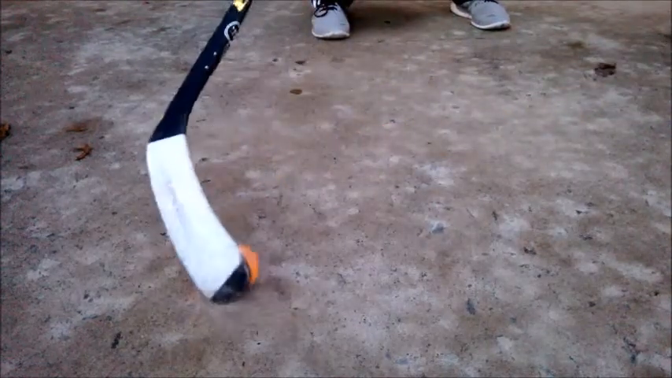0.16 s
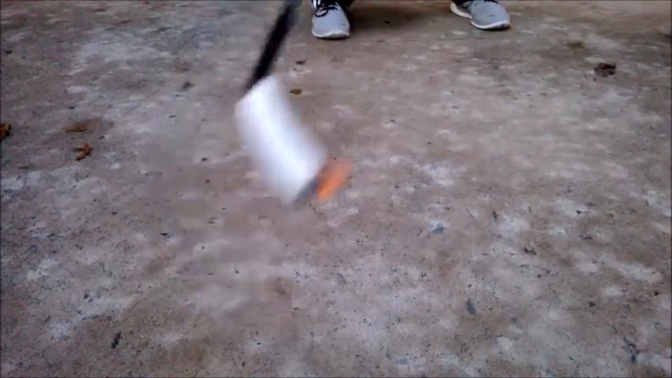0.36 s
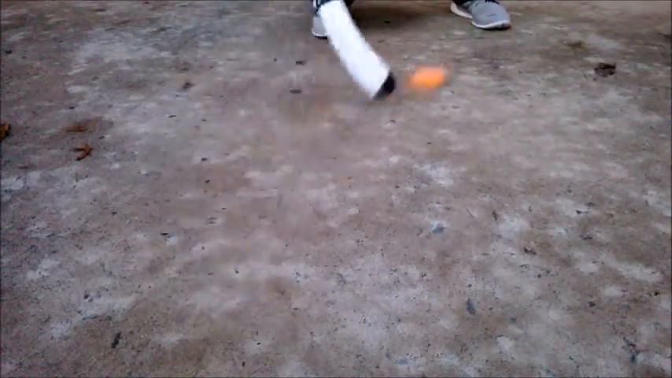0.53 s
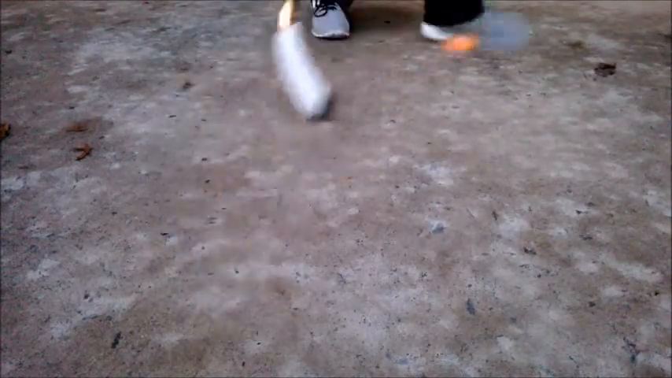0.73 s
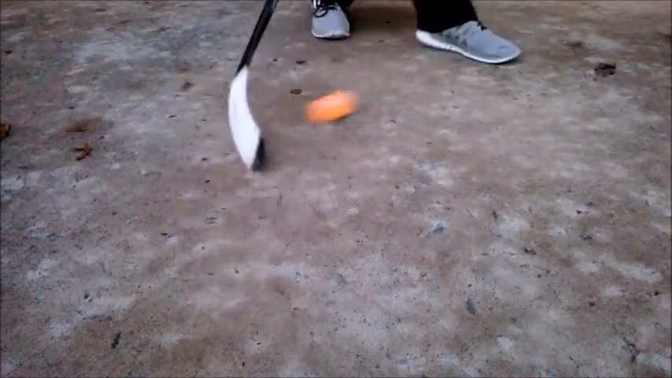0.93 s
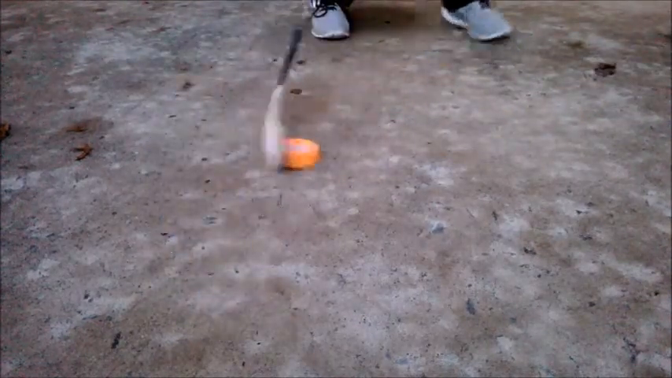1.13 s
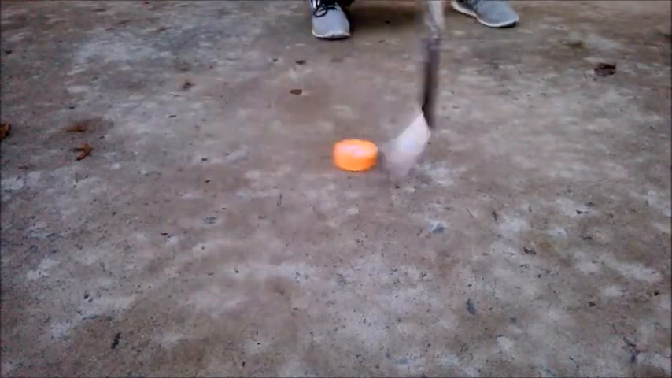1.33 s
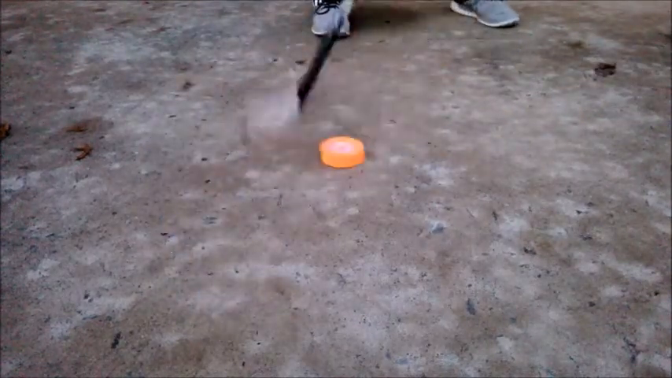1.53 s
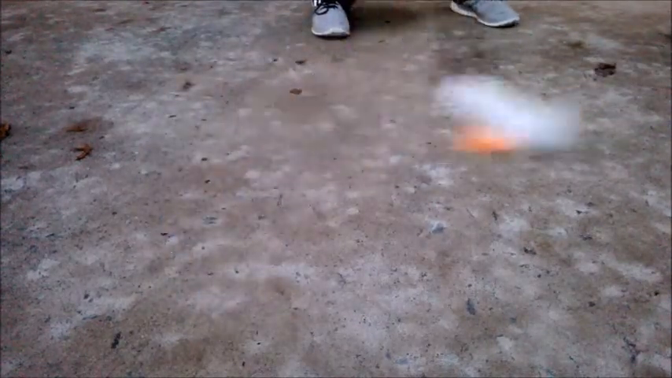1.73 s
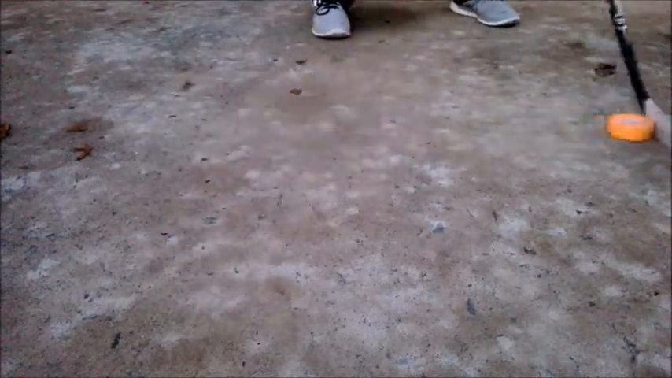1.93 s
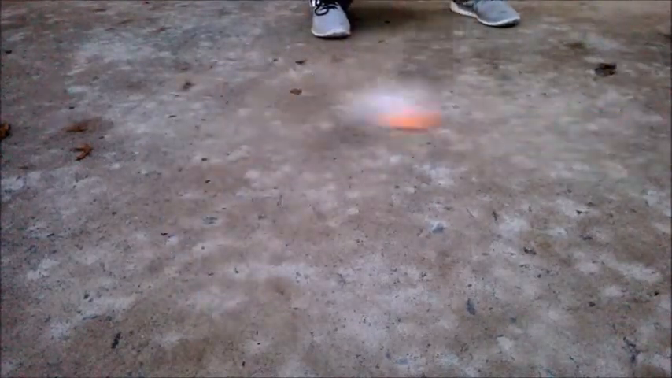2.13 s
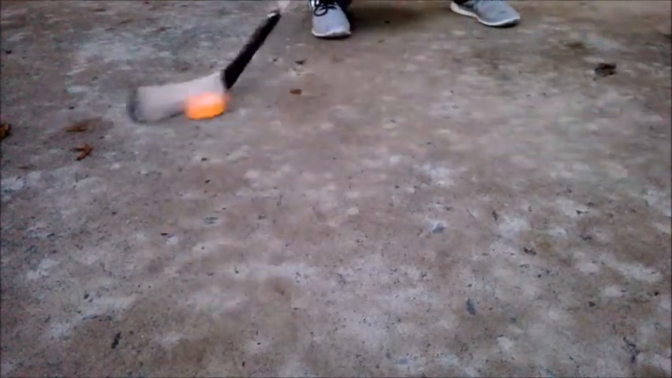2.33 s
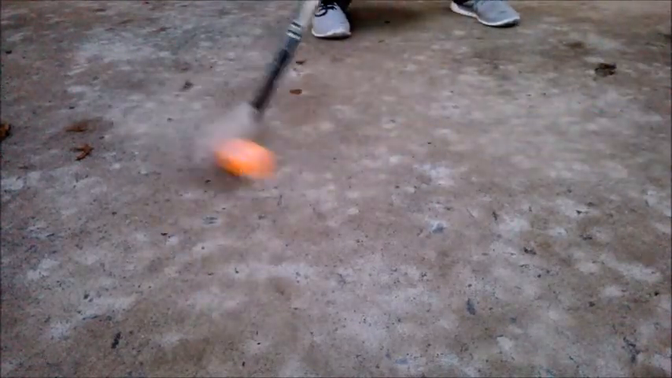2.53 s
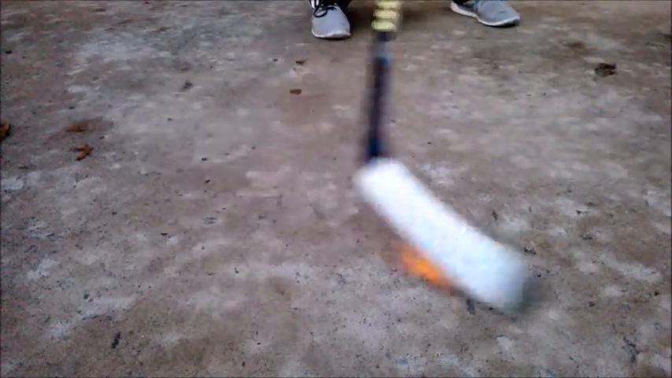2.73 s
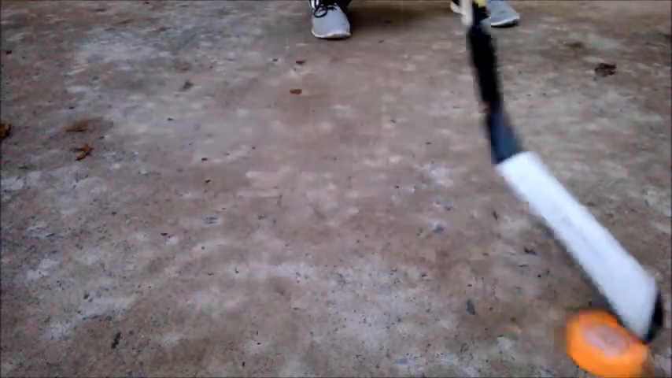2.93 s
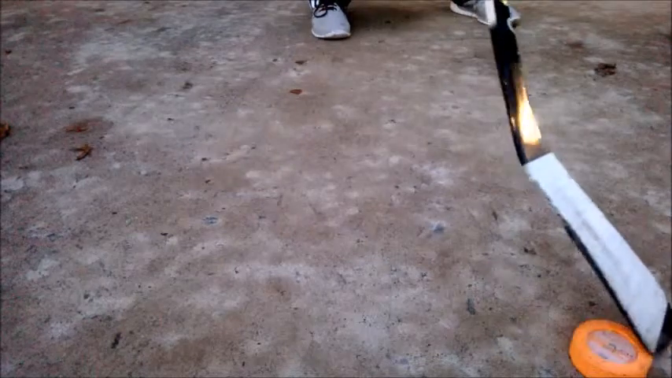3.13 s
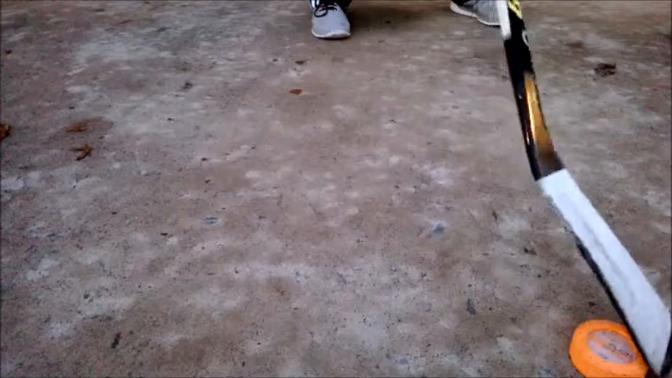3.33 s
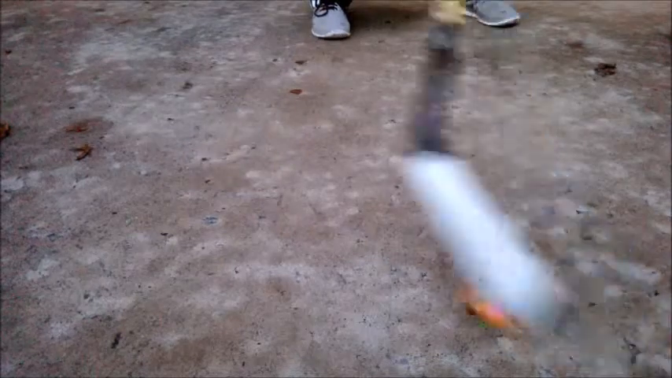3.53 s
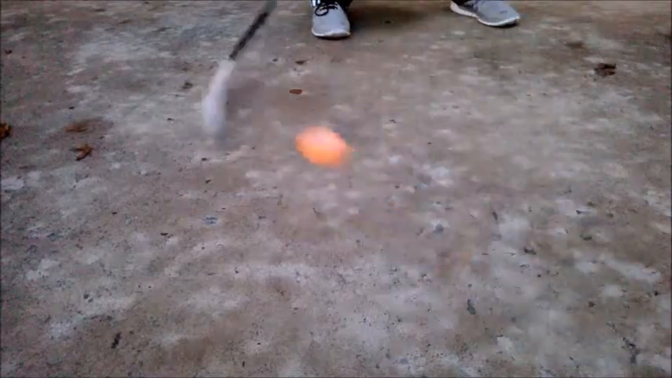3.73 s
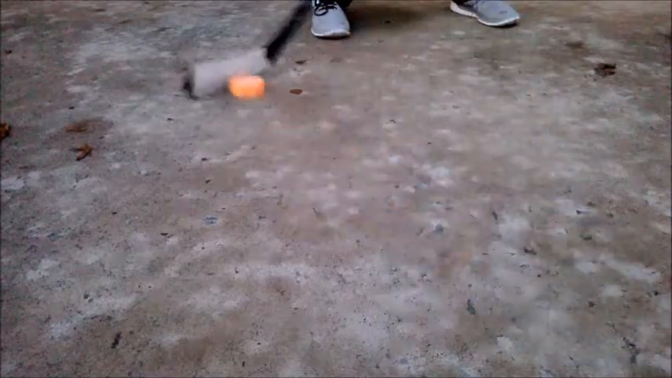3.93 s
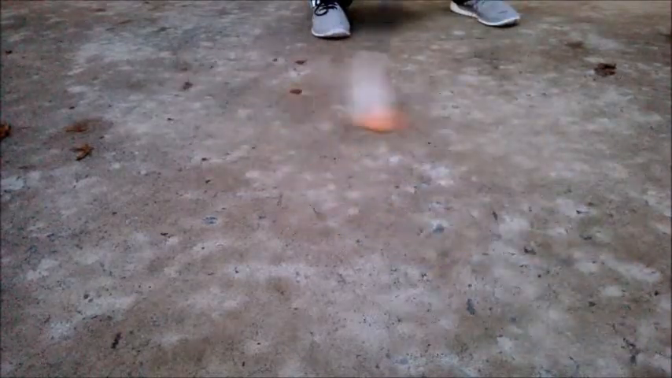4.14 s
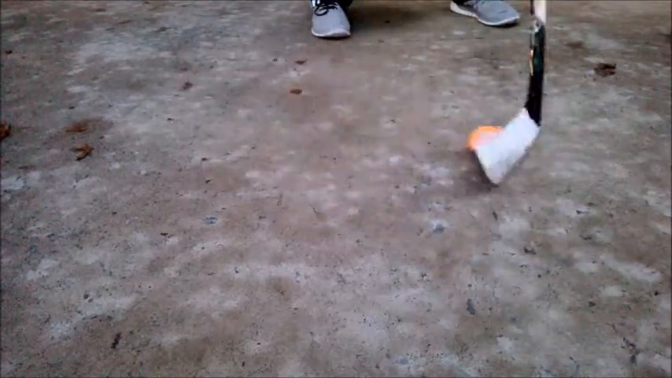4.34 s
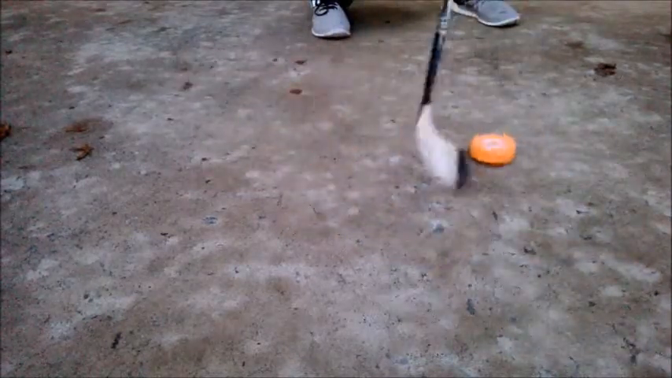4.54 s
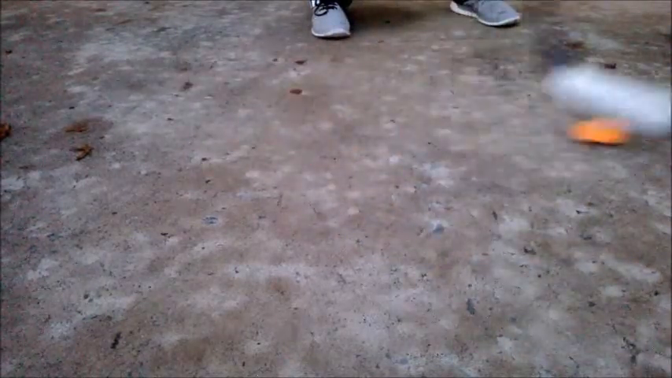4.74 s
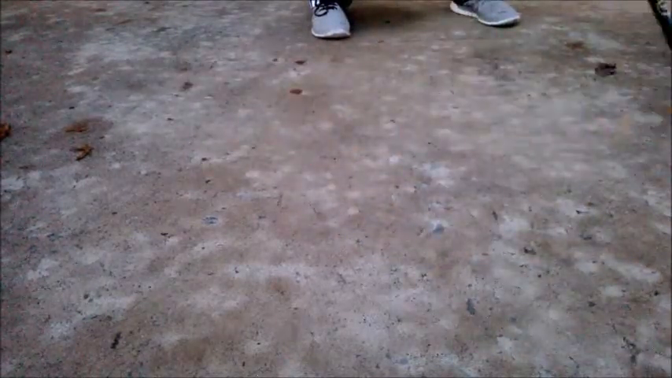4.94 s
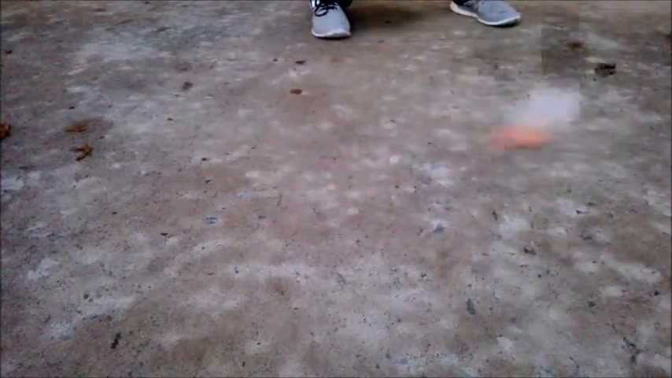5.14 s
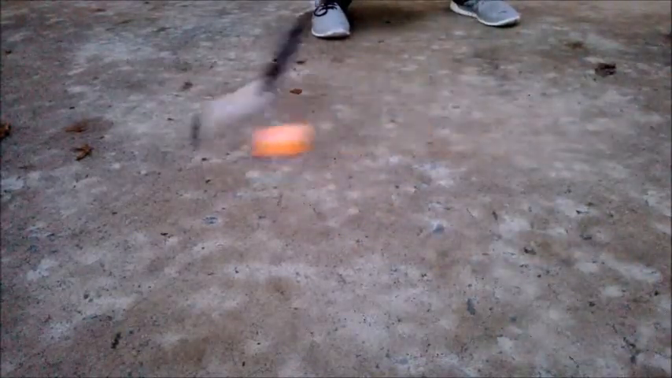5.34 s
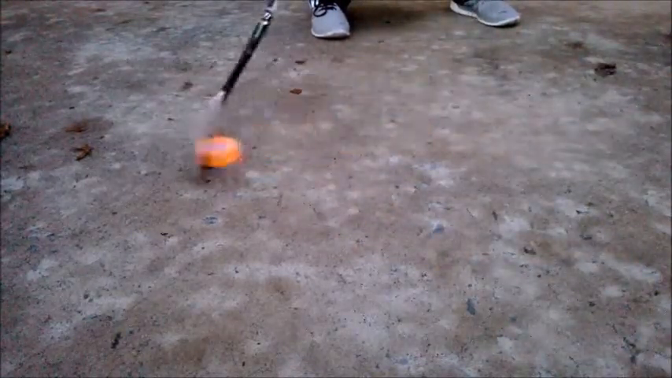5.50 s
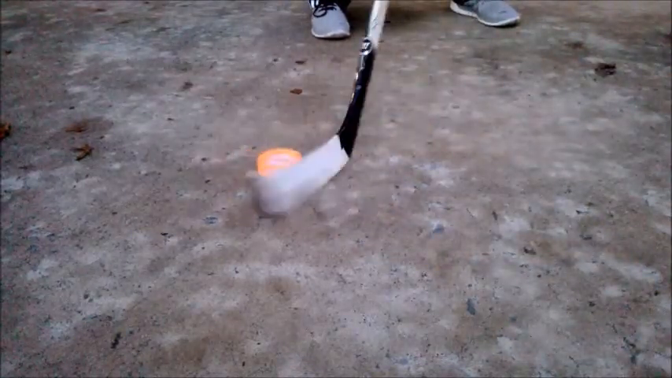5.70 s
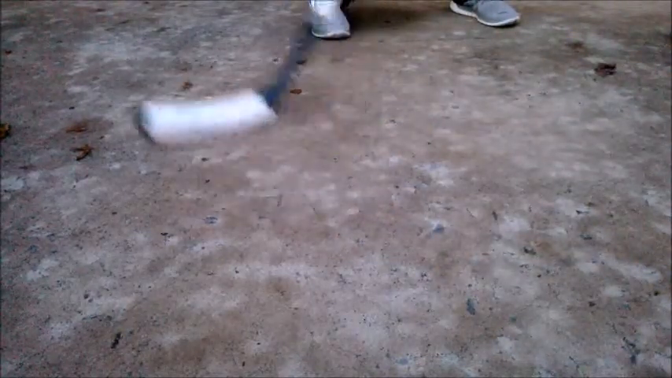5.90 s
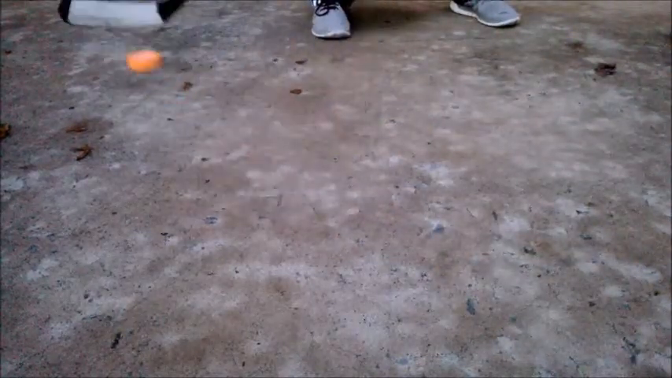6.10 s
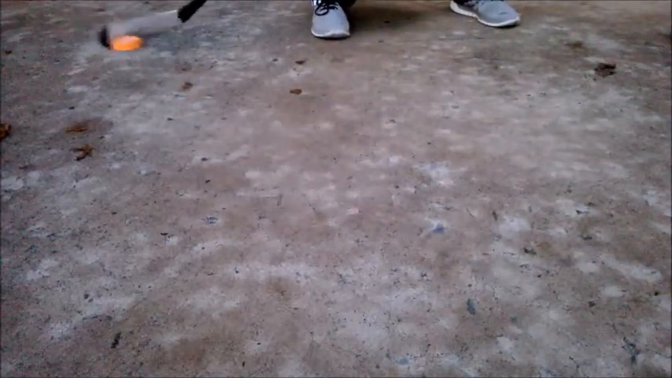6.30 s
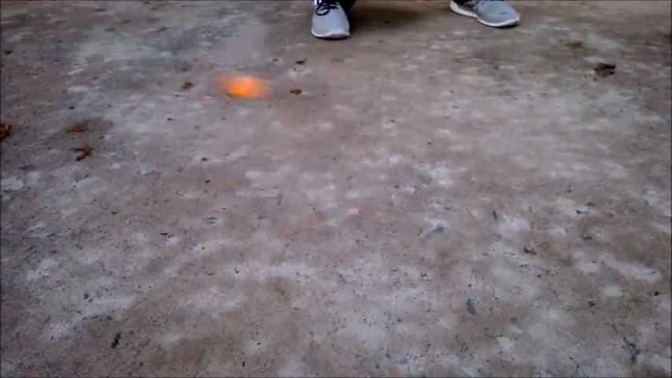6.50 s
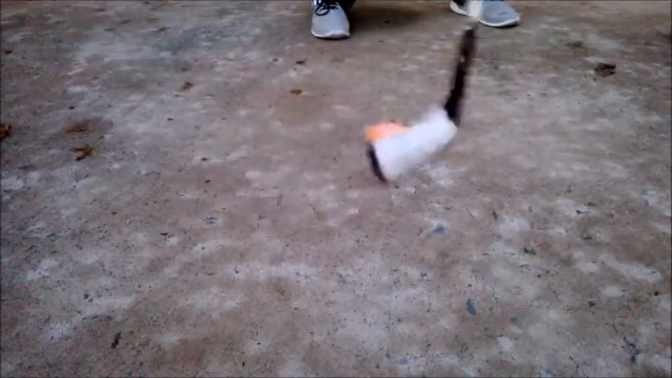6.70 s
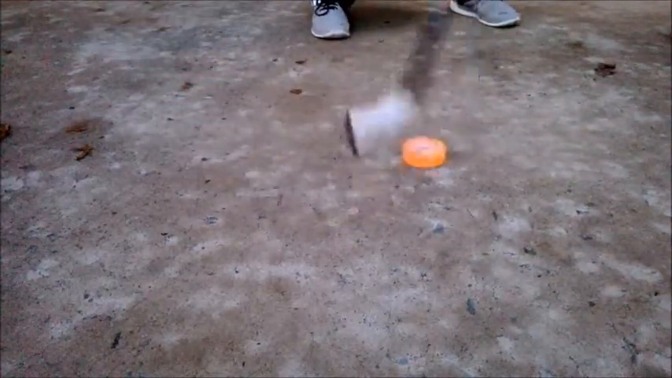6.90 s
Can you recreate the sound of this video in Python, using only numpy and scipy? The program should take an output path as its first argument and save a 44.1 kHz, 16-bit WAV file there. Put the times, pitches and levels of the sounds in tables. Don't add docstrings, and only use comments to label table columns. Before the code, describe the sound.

A taped hockey blade knocks, slaps and scrapes a hard plastic puck over rough concrete in rapid irregular bursts, with brief quieter gaps.

```python
import sys
import numpy as np
from scipy import signal
from scipy.io import wavfile
from scipy.ndimage import uniform_filter1d

SR = 44100
rng = np.random.default_rng(int(sys.argv[2]) if len(sys.argv) > 2 else 0)


def gain_from_db(level_db):
    decades = np.asarray(level_db, float) / 20
    return 10 ** decades


def master_out(mix):
    frames = np.transpose(np.atleast_2d(mix))
    ceiling = np.clip(frames, -1, 1)
    pcm = np.round(ceiling * 32767).astype(np.int16)
    wavfile.write(sys.argv[1], SR, pcm)


N = 311346

# t/s, hold/s, drag level/dB, grit level/dB
SWEEPS = [(.762, 0.1, -27.5, -39), (1.073, 0.11, -19, -30), (1.416, 0.0076, -14, -24.5),
          (1.627, 0.12, -19.5, -22.5), (1.902, 0.029, -15.5, -30.5), (2.447, 0.056, -18.5, -27.5),
          (3.97, 0.14, -19.5, -25), (4.302, 0.099, -21.5, -37.5), (4.643, 0.016, -17.5, -22),
          (5.04, 0.096, -23.5, -30.5), (5.436, 0.16, -29, -34.5), (5.863, 0.0069, -15, -33),
          (6.47, 0.035, -30.5, -36.5), (6.774, 0.0047, -19, -31)]
# t/s, hold/s, drag level/dB, grit level/dB
JABS = [(0, 0.13, -33, -43), (.526, 0.0039, -29.5, -34), (2.337, 0.028, -20, -23.5),
        (2.822, 0.02, -28.5, -33.5), (3.699, .2, -18, -21.5), (4.605, 0.03, -19, -24),
        (4.965, 0.0081, -15.5, -27), (5.794, 0.078, -19, -41.5), (6.311, 0.0025, -10, -32),
        (6.34, 0.09, -24.5, -32.5), (6.403, 0.059, -18.5, -28), (6.689, 0.016, -16, -25.5),
        (6.72, 0.089, -46, -35), (5.485, 0.022, -18, -29)]
# t/s, hold/s, drag level/dB, grit level/dB
PUSHES = [(.37, 0.085, -22.5, -42.5), (.58, 0.13, -45.5, -44.5), (.95, 0.16, -37, -43),
          (1.33, 0.054, -45, -60), (2.15, 0.24, -41.5, -47), (2.68, 0.19, -44, -55),
          (2.96, 0.057, -28, -42), (3.06, 0.028, -57, -59), (3.545, 0.022, -31, -51),
          (3.6, 0.095, -23, -43), (5.25, 0.12, -51, -48), (5.72, 0.05, -40, -66), (6.05, 0.3, -42, -58),
          (6.62, 0.033, -37.5, -53)]
# from t/s, share level/dB, f/Hz
BLADE_LIE = [(0, -3, 798), (0.3, 0, 1410), (0.53, 6, 992), (0.77, -6, 1137), (0.95, -24, 1154),
             (1.075, -5, 1395), (1.2, -0.5, 1350), (1.419, 4, 1576), (1.63, 6.5, 1656), (1.72, 5.5, 1386),
             (1.906, -5, 1304), (2.051, -1.5, 1330), (2.339, -1, 865), (2.439, 2.5, 1500),
             (2.601, -15, 1585), (2.83, -4, 1820), (2.95, 1, 794), (3.54, -6, 1560), (3.7, -0.5, 1043),
             (3.8, 0, 1216), (3.97, 1.5, 850), (4.06, 3.5, 1010), (4.307, 1.5, 1370), (4.4, -1, 1394),
             (4.608, 3.5, 867), (4.69, 7, 1300), (4.97, -18, 1224), (5.05, 1.5, 1680), (5.15, -4, 1680),
             (5.44, 1, 1030), (5.5, 4.5, 1485), (5.8, -1.5, 1473), (5.88, 0, 1680), (6.0, -6, 1500),
             (6.315, 2, 1680), (6.4, -8, 683), (6.48, -1, 1930), (6.688, 11, 1534), (6.779, 3.5, 1530),
             (6.85, -9, 643)]
# f/Hz, width/Hz, level/dB
BLADE_MODES = [(483, 480, -10), (854, 300, -4), (1195, 144, -7.5), (1500, 470, -9.5), (2250, 180, -12)]
# f/Hz, level/dB per Hz
GRIT_COLOUR = [(1410, -8.5), (2700, 6.5), (3380, 5), (3660, -0.5), (4280, 4.5), (6080, -4.5), (6520, -12.5),
               (8210, -14.5), (16000, -50)]
# t/s, length/s, first level/dB, last level/dB
SLIDES = [(.34, 0.14, -49, -37.5), (.5, 0.19, -48, -50), (.79, 0.33, -41, -63), (1.07, 0.26, -66.5, -48),
          (1.43, 0.09, -56.5, -64), (1.66, 0.077, -44, -37), (1.902, 0.35, -45, -54.5),
          (2.337, 0.12, -41, -49), (2.45, 0.45, -40.5, -59.5), (2.97, 0.082, -48, -65),
          (3.515, 0.16, -39.5, -39.5), (3.46, 0.077, -68, -65), (3.699, 0.23, -22, -40.5),
          (3.95, 0.33, -41, -54), (4.643, 0.049, -26, -75), (5.07, 0.33, -41, -57.5),
          (5.436, 0.092, -59, -65), (5.95, 0.37, -48.5, -63), (6.403, 0.078, -38.5, -41),
          (6.51, 0.2, -52.5, -51), (6.774, 0.14, -34, -68)]
# f/Hz, width/Hz, level/dB
PUCK_MODES = [(1650, 280, 0.5), (3930, 160, 1.2), (8070, 302, -1), (2050, 140, -1.5)]
# f/Hz, level/dB
DUST_COLOUR = [(4000, -73), (6000, 12), (9000, 15), (16000, -15.5)]
# t/s, peak level/dB, ring f/Hz, crack level/dB re ring, rebound after/ms
SLAPS = [(0.5216, -9, 1060, -5, 2.96), (1.072, -10.5, 1170, -5, 3.7), (1.4154, 4, 1500, -23, 4.1),
         (1.627, 0.5, 2140, -34, 3.06), (1.9027, 0, 1434, -14.5, 1.68), (3.6996, -1, 937, 3, 3.5),
         (4.017, 1.5, 1230, -6.5, 2.8), (5.019, -0.5, 730, -17, 1.11), (5.443, -2.5, 1130, -12, 4.05),
         (5.48, 1, 1560, -9, 4.4), (6.6921, -7, 2070, -7, 3.32), (6.7725, -0.5, 1430, -13, 4.3)]
# t/s, peak level/dB, ring f/Hz, crack level/dB re ring
KNOCKS = [(0.5886, -16, 1680, -15), (0.762, -17, 1080, -8), (1.093, -1, 1410, -13),
          (1.159, -7.5, 1500, -26), (1.4687, 1, 1370, -26), (1.6908, 5, 1680, -23), (1.834, -13, 2070, -5),
          (1.936, 1, 1210, -32), (2.3352, -9.5, 755, -2), (2.348, -0.5, 920, -4), (2.3998, 0.5, 1340, -30),
          (2.4114, -6, 750, -21), (2.8209, -10, 563, -20), (3.7256, -5.5, 1020, 0.5), (3.96, -10, 920, -14),
          (4.0396, -2, 1080, -10), (4.3025, 0, 1780, -15.5), (4.607, 3.5, 950, -22),
          (4.84, -8, 1650, -13.5), (4.9679, -3.5, 1230, -17), (5.1036, -6.5, 1570, -4),
          (5.7942, -14.5, 1300, -11), (5.869, -2, 1450, -18), (5.9316, -28, 1550, -13),
          (6.3108, -1, 1730, -17), (6.3386, 1, 810, -10), (6.4054, -8, 2000, -26), (6.4564, -9, 790, -24),
          (6.6976, -4, 1300, -20), (6.839, -2.5, 745, -38)]
# t/s, peak level/dB, ring f/Hz
CLACKS = [(0.6562, -17, 940), (0.8637, -18.5, 2000), (0.9638, -14.5, 1900), (2.224, -25, 1580),
          (2.309, -22, 2140), (2.3397, -2.5, 890), (2.5055, -5.5, 786), (2.568, -7.5, 1410),
          (2.999, -19, 1500), (3.619, -29, 1560), (3.754, -8, 1110), (3.9818, -11.5, 710),
          (4.35, -7.5, 2140), (4.383, -14, 980), (4.6767, -0.5, 1380), (4.955, -13.5, 1450),
          (5.0896, -6, 1650), (5.1228, -6, 2260), (5.2795, -15, 1580), (5.854, -13, 1600),
          (6.66, -27, 2050)]
# f/Hz, level/dB
CRACK_COLOUR = [(2000, -3.5), (3500, -3), (5500, 10), (8500, -7), (15000, -43)]
# t/s, peak level/dB, ring f/Hz
CATCHES = [(0.1308, -25, 680), (0.3408, -24, 1370), (0.7672, -16, 2170), (1.052, -19, 950),
           (1.0748, -16, 890), (1.104, -4, 1440), (1.637, -4, 1440), (1.7603, -10.5, 1770),
           (2.0067, -13, 1230), (2.3397, -17, 860), (2.3807, -5.5, 750), (2.4924, -10, 760),
           (2.498, -13, 1400), (2.5146, -8, 1330), (2.9427, -16, 883), (2.969, -21.5, 1650),
           (3.6494, -14, 1470), (3.7862, -15, 990), (3.8077, -13, 1460), (3.819, -16, 1170),
           (3.9412, -19.5, 700), (4.007, -13, 720), (4.0456, -8, 880), (4.3836, -3.5, 1430),
           (4.3956, -12, 1660), (4.4206, -20, 1610), (4.434, -21, 1550), (4.7472, -14.5, 1380),
           (4.9684, -3.5, 1160), (5.0329, -9, 860), (5.0524, -13, 1370), (5.1035, -15, 1570),
           (5.1352, -8, 1800), (5.197, -16.5, 1580), (5.2284, -19, 1920), (5.7937, -8, 1310),
           (5.8418, -7, 860), (5.9324, -7.5, 920), (5.972, -19, 1540), (6.3105, -21, 1640),
           (6.3466, -9.5, 790), (6.412, -9, 800), (6.419, -10, 2210), (6.443, -8, 640), (6.4491, -8.5, 613),
           (6.7982, -10.5, 1830), (6.8385, -12, 780), (6.8516, -10, 800), (6.9241, -18, 1700),
           (6.9574, -21, 1290)]
# t/s, peak level/dB, ring f/Hz
PINGS = [(0.761, -25, 4200), (0.785, -22, 4550), (0.826, -21.5, 4020), (1.0623, -23, 3910),
         (1.091, -9.5, 3730), (1.159, -17.5, 3970), (1.4142, -21, 3210), (1.468, -18, 3450),
         (1.53, -22.5, 3480), (1.626, -6.5, 3960), (1.6903, -8.5, 3740), (1.901, -16, 3700),
         (1.9119, -12, 3180), (2.047, -16, 2970), (2.229, -27, 7770), (2.2754, -32, 7920),
         (2.292, -21.5, 3840), (2.335, -7, 4870), (2.348, -11, 4080), (2.5045, -14.5, 4400),
         (2.529, -15, 4120), (2.6925, -29, 3920), (2.7243, -29, 3930), (2.821, -19, 3250),
         (3.531, -19, 3930), (3.7046, -4.5, 4070), (3.8182, -19, 4320), (3.9415, -25, 7960),
         (4.0266, -11, 3370), (4.0533, -14.5, 5330), (4.607, -20, 4170), (4.6425, -11, 5200),
         (4.8655, -27, 3800), (4.9779, -23, 4110), (5.124, -14, 4920), (5.146, -17, 4000),
         (5.349, -26, 3900), (5.3574, -26, 7970), (5.549, -19.5, 3570), (5.8453, -24, 4260),
         (5.865, -29, 4230), (6.318, -19, 4430), (6.347, -17, 3470), (6.5447, -28, 3980),
         (6.6114, -28, 4330), (6.6884, -12.5, 3950)]
# t/s, peak level/dB, ring f/Hz
TICKS = [(0.482, -19.5, 1650), (.664, -16, 2070), (.784, -14, 1760), (0.816, -16.5, 1480),
         (1.062, -17.5, 2210), (2.176, -21, 1560), (2.291, -17, 1870), (2.6572, -19.5, 1930),
         (2.792, -15.5, 1750), (2.839, -14.5, 1580), (2.8919, -12, 1720), (2.898, -14, 1810),
         (2.9348, -11.5, 1680), (3.577, -17, 1480), (4.1462, -9.5, 1820), (4.2049, -15.5, 1770),
         (4.951, -11.5, 2030), (5.22, -24, 1990), (5.3486, -16, 1940), (5.4358, -9, 1750),
         (5.5483, -14.5, 1460), (5.743, -17.5, 1760), (5.87, -5, 1590), (5.919, -28, 1600),
         (5.9982, -19, 1710), (6.9163, -17, 1760)]
# t/s, peak level/dB
WOBBLES = [(0.7442, -18), (4.873, -24.5), (5.711, -24.5), (6.96, -32), (1.2595, -24), (1.2943, -18.5),
           (1.331, -22), (1.361, -27), (2.148, -20.5), (2.2275, -20.5), (2.67, -22), (2.704, -21.5),
           (2.7582, -19), (2.778, -20), (2.9694, -30.5), (3.5013, -27.5), (4.321, -11), (5.343, -22),
           (5.641, -24), (5.675, -25.5), (6.11, -25.5), (6.1512, -28), (6.2237, -21), (6.278, -21),
           (6.4984, -22), (6.611, -28)]
# t/s, peak level/dB
SNAPS = [(0.5474, -39), (0.6295, -43), (0.6496, -35), (2.4488, -25), (2.4673, -27), (2.4844, -25),
         (2.4917, -22), (2.6, -35), (2.6489, -45), (2.6705, -38), (3.0484, -19), (3.5206, -32),
         (3.5434, -19), (3.5752, -15), (3.6153, -23.5), (5.2544, -45), (5.3283, -41), (5.7109, -45),
         (6.0364, -33), (6.0994, -45), (6.1094, -38), (6.2243, -30.5), (6.5545, -36), (6.6014, -37),
         (6.6194, -37), (6.6493, -32)]
# t/s, peak level/dB, f/Hz
FOOTSTEP = (.762, -9.5, 117)
# t/s, level/dB, start f/Hz, f/Hz soon after the start, length/s
BIRD = [(0.354, -38, 5760, 5580, 0.081), (0.967, -39, 5640, 5600, 0.065), (2.02, -38.5, 5360, 5430, 0.061),
        (2.958, -49, 4600, 5700, 0.19), (2.984, -45, 5300, 5400, 0.11), (3.994, -31, 5300, 5250, 0.025),
        (3.63, -39, 5450, 5360, 0.068), (4.359, -43, 5600, 5460, 0.11), (4.923, -43.5, 4280, 5520, 0.089),
        (5.41, -44, 5400, 5400, 0.072), (6.005, -38.5, 5420, 5440, 0.077)]
# f/Hz, t60/s
YARD_DECAY = [(300, 0.35), (3000, 0.46), (12000, 0.067)]
# f/Hz, level/dB per Hz
AIR_COLOUR = [(12, -41.5), (20, -17), (37, -7), (74, -6), (130, -14), (168, -16), (1090, -30.5),
              (1220, -34), (2020, -48), (5230, -44), (16000, -55.5)]
# t/s, f/Hz, level/dB
MOTOR = [
    (3, 1062, -57.5),
    (3.299, 1200, -63),
    (3.6, 1364, -57.5),
]
# f/Hz, level/dB
MIC_RESPONSE = [(2450, -1.5), (2780, -5), (3200, -2.5), (10000, -3), (15700, -11), (16200, -47.5),
                (16800, -88)]
DROPOUTS = [.6, .94, 1.73, 3.84, 3.91, 3.99, 4.08, 4.14, 6.38, 6.455]
SURVIVOR_HZ = [3310, 4270, 5140, 6440, 9140, 9780]


def evened(x):
    return x / np.sqrt(np.mean(x ** 2) + 1e-20)


def read(points, hz):
    f, value = np.transpose(points)
    return np.interp(np.log(hz + 1), np.log(f + 1), value)


def add(mix, s, sound):
    part = mix[round(s * SR):][:len(sound)]
    part += sound[:len(part)]


def smoothed(x, pole):
    return signal.lfilter([1], [1, -pole], x)


def ring(x, hz, width):
    return signal.lfilter(*signal.iirpeak(hz, hz / width, SR), x)


def body(x, modes):
    total = 0
    for k, (hz, width, db) in enumerate(modes):
        total = total + (-1) ** k * gain_from_db(db) * ring(ring(x, hz, width), hz, 4 * width)
    return total


def coloured(x, points):
    half = read(points, np.fft.rfftfreq(4096, 1 / SR)) * np.log(10) / 20
    log_gain = np.r_[half, half[-2:0:-1]]
    taps = np.fft.ifft(np.exp(np.conj(signal.hilbert(log_gain)))).real
    return signal.oaconvolve(x, taps[:2048])[:len(x)]


def dulled(x):
    return signal.sosfilt(signal.cheby1(5, 1, 2514, fs=SR, output="sos"), x)


def judder(depth_db, ms):
    return gain_from_db(depth_db * evened(smoothed(rng.standard_normal(N), np.exp(-1000 / (ms * SR)))))


def bumps(per_s, spread_db, smooth):
    draw = rng.random((3, N))
    size = gain_from_db(spread_db * np.minimum(-np.log(draw[0]), 4)) * np.sign(draw[1] - .5)
    return evened(size * (draw[2] < per_s / SR)) + smooth * rng.standard_normal(N)


def slips(per_s, spread_db):
    beat = np.cumsum(per_s * judder(4, 6)) / SR
    releases = np.diff(np.floor(beat), prepend=0)
    return evened(releases * judder(spread_db, 5.1) * rng.uniform(0.14, 1, N))


def patchy(x, depth_db):
    z = signal.stft(x, nperseg=256)[2]
    across = uniform_filter1d(rng.standard_normal(z.shape), size=3, axis=0)
    patches = evened(uniform_filter1d(across, size=9, axis=1))
    return evened(signal.istft(z * gain_from_db(depth_db * np.clip(patches, -2, 2)), nperseg=256)[1][:N])


def pressure(rows, rise, fall):
    t = np.arange(N // 16 + 1) * 16 / SR
    power = 0
    for s, hold, first, last in rows:
        end = s + abs(hold)
        times = [s - 80 / rise, s, end, end + 80 / fall]
        power = power + gain_from_db(2 * np.interp(t, times, [first - 80, first, last, last - 80]))
    return np.interp(np.arange(N) / SR, t, np.sqrt(power))


def blade_pressure(column, steep):
    land, lean = 19990.5, 376
    sag, ease, lift = 15.5, 113, 524
    power = 0
    for rows, rise, fall in ((SWEEPS, land, ease), (JABS, land, lift), (PUSHES, lean, lift)):
        held = [(r[0], r[1], r[column], r[column] - steep * sag * r[1]) for r in rows]
        power = power + pressure(held, rise * steep, fall * steep) ** 2
    return np.sqrt(power)


def lying(x):
    s, db, hz = np.transpose(BLADE_LIE)
    row = np.clip(np.searchsorted(s, np.arange(N) / SR) - 1, 0, None)
    turn = np.exp(2j * np.pi * np.cumsum(uniform_filter1d(hz[row], size=600)) / SR)
    r = np.exp(-np.pi * 254 / SR)
    once = signal.lfilter([1 - r], [1, -r], x / turn)
    rung = (turn * signal.lfilter([1 - r ** 3], [1, -r ** 3], once)).real
    return evened(rung) * gain_from_db(uniform_filter1d(db[row], size=600))


def blade_strokes(drag, hiss):
    catches = slips(170, 4)
    contact = (.5 * catches + bumps(1500, 5.05, 0.66)) * judder(1.9, 2.1)
    spikes = evened(ring(np.convolve(catches, np.hanning(17))[:N], 900, 770))
    blade = 0.63 * patchy(body(contact, BLADE_MODES), 4.7) + 0.61 * lying(contact) + 0.45 * spikes
    grit = patchy(coloured(contact + bumps(4500, 2.4, 0.27), GRIT_COLOUR), 2.8)
    return drag * dulled(blade) + hiss * grit


def puck_skitter(drag):
    kick, skip = 2500.5, 490
    skitter = gain_from_db(-3.5) * pressure(SLIDES, kick, skip)
    hops = bumps(240, 3.2, .42) * judder(2.4, 12)
    ringing = patchy(body(hops, PUCK_MODES), 3.5)
    dust = .85 * hops + .5 * rng.standard_normal(N) * judder(4, 8)
    fizz = patchy(coloured(dust, DUST_COLOUR), 2.5)
    puck = ringing / (1 + 14 * drag) + 0.26 * fizz
    top_level = np.std(ring(ring(ringing, 7360, 1520), 7470, 3500))
    return skitter * puck / top_level


def strokes():
    drag = gain_from_db(-3.5) * blade_pressure(column=2, steep=1)
    hiss = gain_from_db(-3.5) * blade_pressure(column=3, steep=1.05)
    return blade_strokes(drag, hiss) + puck_skitter(drag)


def blows():
    slaps = [row[:4] for row in SLAPS]
    rebounds = [(s + ms / 1000, db - 5.5, 1230, -27.5) for s, db, _, _, ms in SLAPS]
    clacks = [(*row, -4) for row in CLACKS]
    return slaps + rebounds + KNOCKS + clacks


def knock(s, db, hz, crack_db):
    t = np.arange(3000) / SR
    size, gate, noise = rng.standard_normal((3, 3000))
    chatter = 0.37 * size * (abs(gate) > 2.1) * gain_from_db(-60 * t / 0.032)
    blow = np.r_[-1, chatter[1:]]
    push = np.convolve(blow, np.hanning(15))[:len(t)]
    tone = ring(ring(push, hz, 400), hz, 3900)
    tone = tone + 0.14 * body(push, BLADE_MODES) + 0.31 * ring(push, 1140, 1600)
    crack = coloured(0.19 * blow + 0.54 * noise * gain_from_db(-60 * t / 0.017), CRACK_COLOUR)
    thud = 0.018 * np.sin(2 * np.pi * 90 * t) * gain_from_db(-60 * t / 0.056)
    return s, gain_from_db(db) * (thud + tone / abs(tone).max() + gain_from_db(crack_db - 8.0) * crack / abs(crack).max())


def catch(s, db, hz):
    blow = np.r_[-np.hanning(13), np.zeros(900)]
    tone = dulled(ring(ring(blow, hz, 400), hz, 2370) + 0.2 * body(blow, BLADE_MODES))
    return s, gain_from_db(db - 1.5) * tone / abs(tone).max()


def ping(s, db, hz):
    t = np.arange(900) / SR
    puff = np.r_[-1, 0.3 * rng.standard_normal(899)] * gain_from_db(-60 * t / 0.015)
    tone = ring(ring(puff, hz, 300), hz, 1500) + 0.067 * ring(ring(puff, 6000, 5000), 4600, 5500)
    return s, gain_from_db(db - 3) * tone / abs(tone).max()


def tick(s, db, hz):
    blow = np.r_[-np.hanning(13), np.zeros(1500)]
    click = np.r_[-1, np.zeros(len(blow) - 1)]
    low = ring(ring(ring(blow, hz, 250), hz, 710), hz, 1400)
    low = dulled(low + 0.29 * ring(ring(blow, 930, 580), 560, 840))
    high = body(click, [PUCK_MODES[1], (8040, 300, -8)]) + 0.07 * ring(click, 2400, 2360)
    return s, gain_from_db(db) * (low / abs(low).max() + gain_from_db(-26) * high / abs(high).max())


def wobble(s, db):
    return tick(s, db, 1680 * (1 + 0.063 * rng.standard_normal()))


def snap(s, db):
    t = np.arange(400) / SR
    puff = rng.standard_normal(400) * gain_from_db(-60 * t / 0.0094)
    tone = ring(ring(puff, 6000, 6500), 7900, 7000) + 1.2 * ring(puff, 8500, 500) + 0.33 * ring(puff, 9200, 2500)
    return s, gain_from_db(db + 0.5) * tone / abs(tone).max()


def footstep(s, db, hz):
    t = np.arange(4000) / SR
    return s, gain_from_db(db) * np.sin(2 * np.pi * hz * t ** 0.76 * 0.52) * gain_from_db(-60 * t / 0.02)


def chirp(s, db, start_hz, main_hz, length):
    u = np.arange(int(length * SR)) / (length * SR)
    glide = [start_hz, main_hz, .99 * main_hz, .94 * main_hz, .93 * main_hz]
    hz = np.interp(u, [0, .15, .4, .55, 1], glide)
    flutter = 1.1 + evened(uniform_filter1d(rng.standard_normal(9000), size=40))[:len(u)]
    hz = hz + 120 * (flutter[::-1] - flutter.mean())
    swell = np.sin(np.pi * u ** .55)
    return s, gain_from_db(db) * np.sin(2 * np.pi * np.cumsum(hz) / SR) * flutter * swell * 0.7


def yard(x):
    taps = rng.standard_normal(SR // 2) * (np.arange(SR // 2) > 200)
    hz, t, z = signal.stft(taps, SR, nperseg=256)
    tail = signal.istft(z * gain_from_db(-60 * t / read(YARD_DECAY, hz)[:, None]), SR, nperseg=256)[1]
    return signal.fftconvolve(x, tail / np.linalg.norm(tail))[:N]


def outdoors():
    air = evened(coloured(rng.standard_normal(N), AIR_COLOUR) * judder(1.5, 60))
    t = np.arange(N) / SR
    s, hz, db = np.transpose(MOTOR)
    turn = np.exp(2j * np.pi * np.cumsum(np.interp(t, s, hz)) / SR)
    noise = rng.standard_normal(N) + 1j * rng.standard_normal(N)
    fuzz = smoothed(noise, np.exp(-np.pi * 25 / SR))
    return gain_from_db(-47.5) * air + gain_from_db(np.interp(t, s, db, -99, -99)) * evened((turn * fuzz).real)


def scene():
    near = strokes()
    for maker, table in ((knock, blows()), (catch, CATCHES), (ping, PINGS), (tick, TICKS), (wobble, WOBBLES),
                         (snap, SNAPS), (footstep, [FOOTSTEP]), (chirp, BIRD)):
        for row in table:
            add(near, *maker(*row))
    echoes = gain_from_db(-15.0) * yard(near)
    return (near + echoes + outdoors())[None]


def thin_treble(x):
    hz, t, z = signal.stft(x, SR, nperseg=1024, noverlap=768)
    for s, draw in zip(DROPOUTS, rng.random((len(DROPOUTS), 200))):
        kept = draw[np.arange(len(hz)) // 3] > .5 + hz / 24000
        treble = np.where(kept, 2.2, np.clip(.7 - hz / 12000, .12, 1))
        if s == DROPOUTS[-1]:
            near = abs(hz[:, None] - SURVIVOR_HZ).min(axis=1) < 90
            treble = np.where(near, gain_from_db(12.5), .1)
        gain = np.where(hz < 2700, 1, treble)
        z[:, abs(t - s) < .012] *= gain[:, None]
    return signal.istft(z, SR, nperseg=1024, noverlap=768)[1][:N]


def top_cut(x):
    return signal.sosfilt(signal.butter(12, 16640, fs=SR, output="sos"), x)


def record(dry):
    heard = thin_treble(coloured(np.clip(dry[0], -1.2, 1.2), MIC_RESPONSE))
    hiss = gain_from_db(-79) * ring(ring(rng.standard_normal(N), 13500, 5000), 13500, 5000)
    return top_cut((heard + hiss)[None])


dry = scene()
out = record(dry)
master_out(out)
```